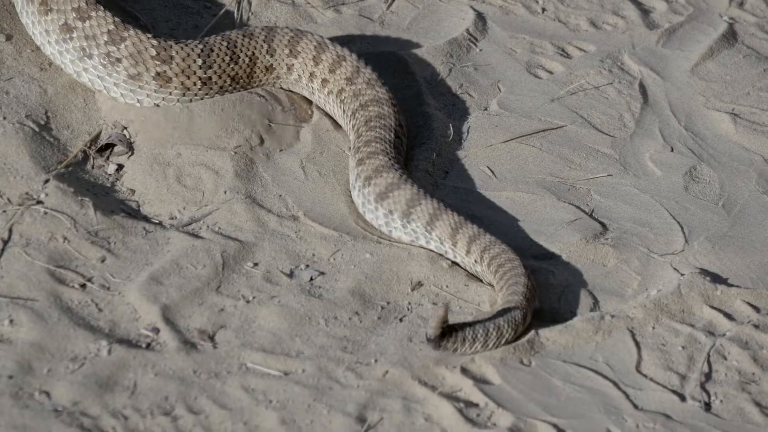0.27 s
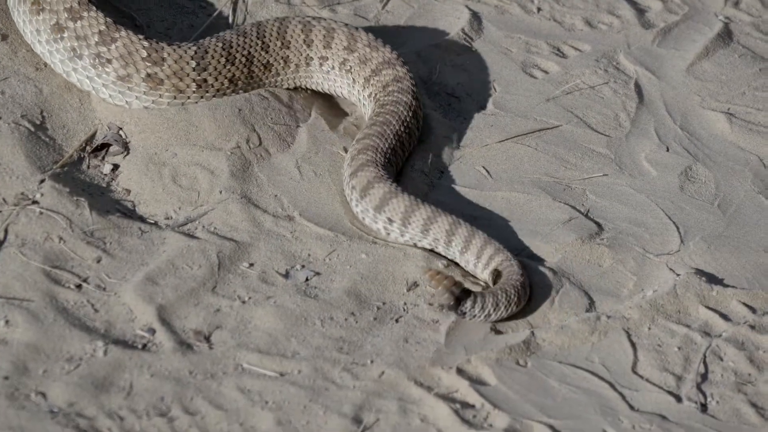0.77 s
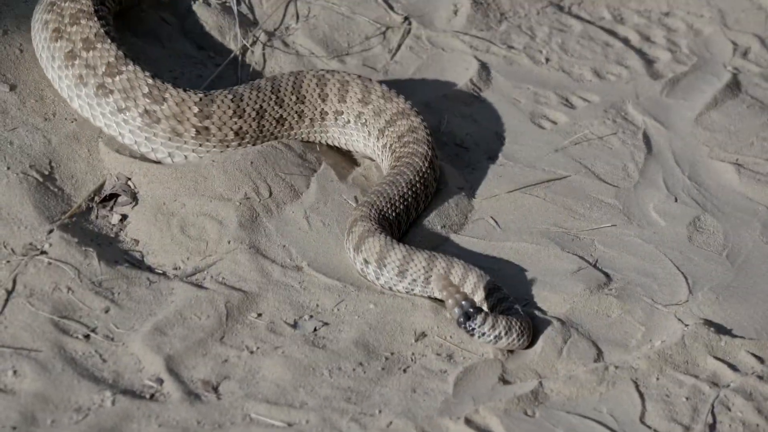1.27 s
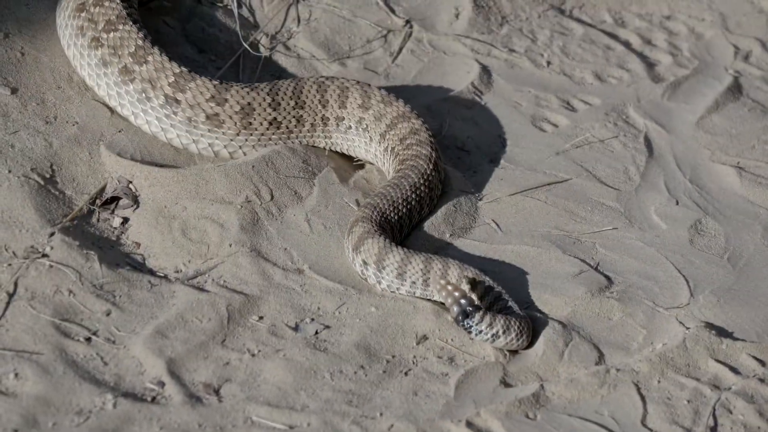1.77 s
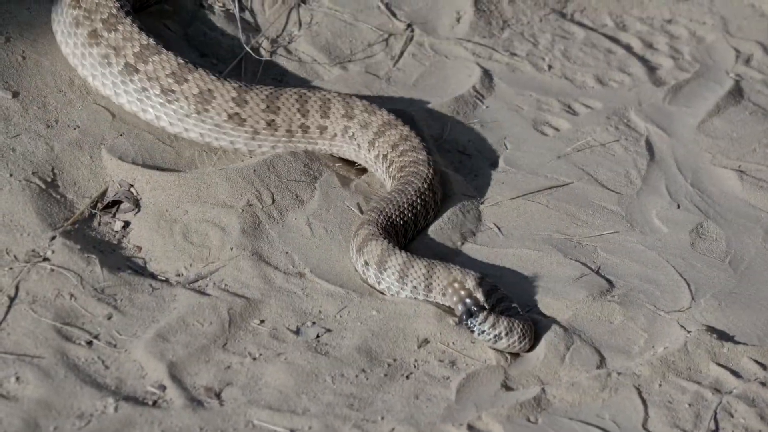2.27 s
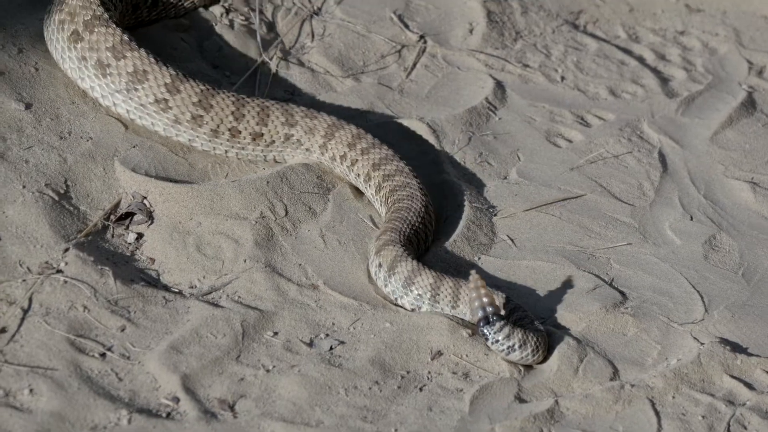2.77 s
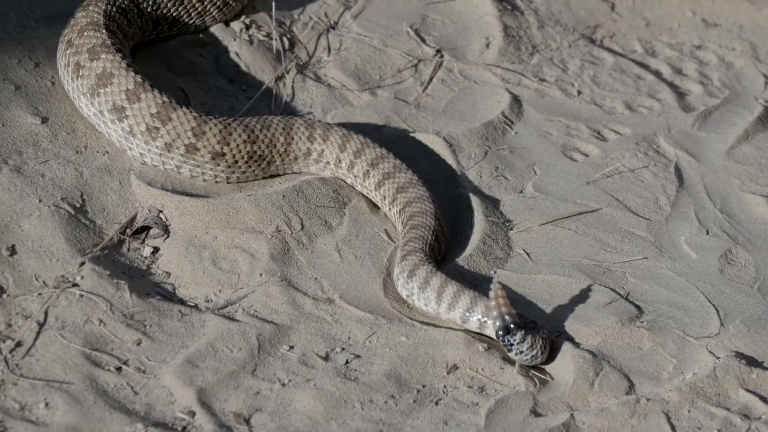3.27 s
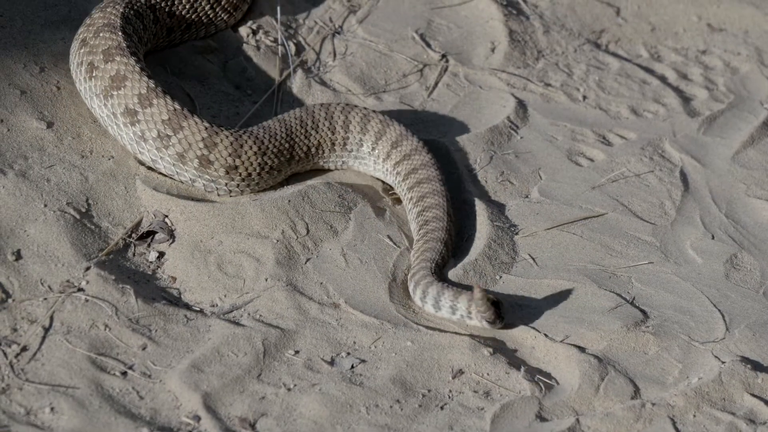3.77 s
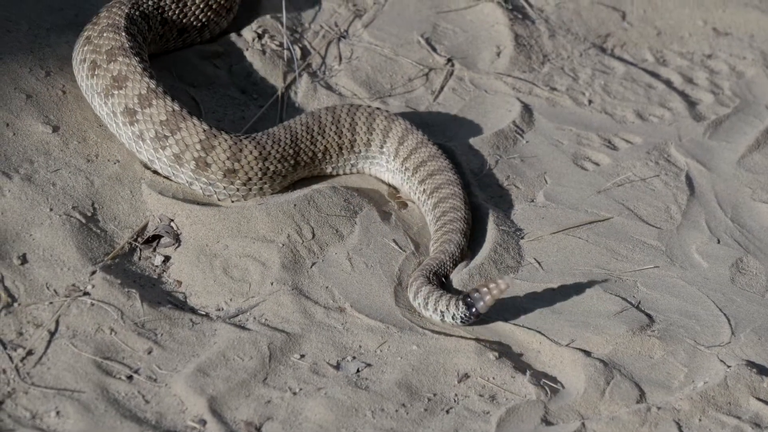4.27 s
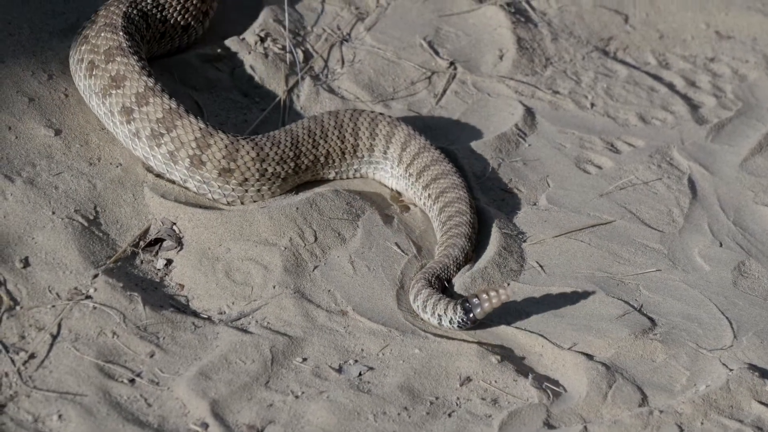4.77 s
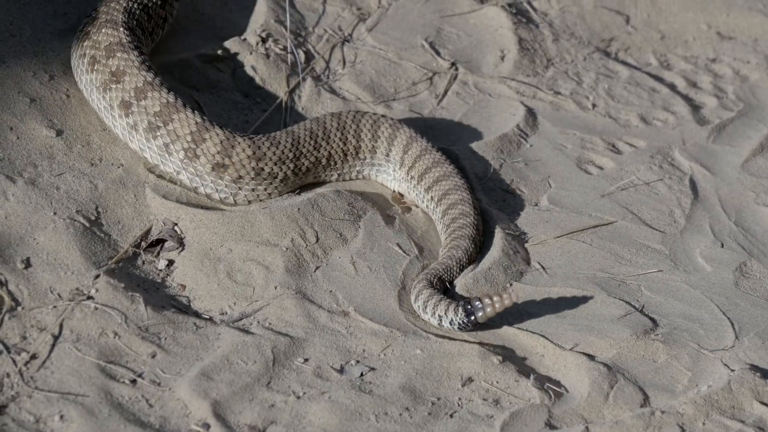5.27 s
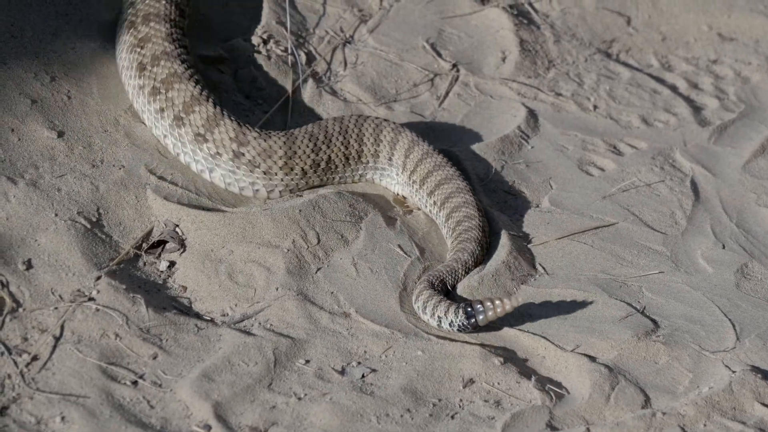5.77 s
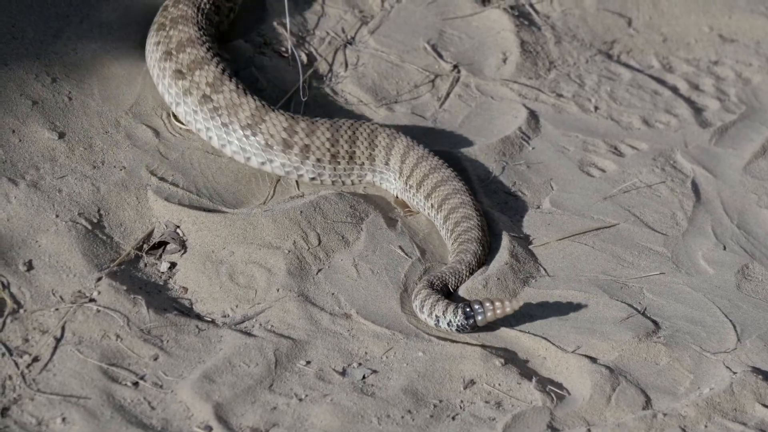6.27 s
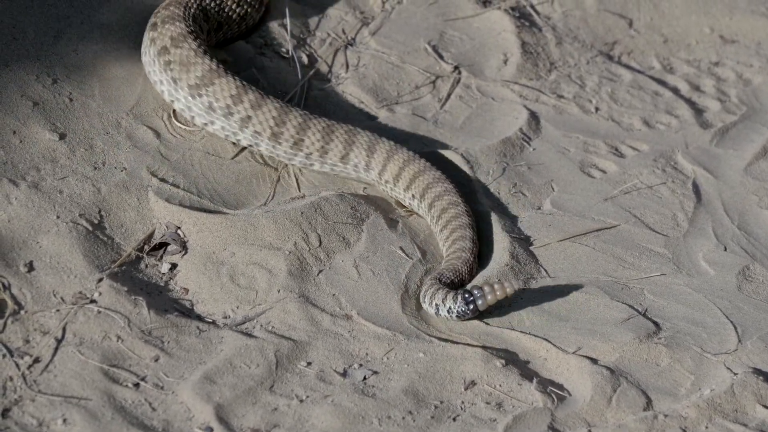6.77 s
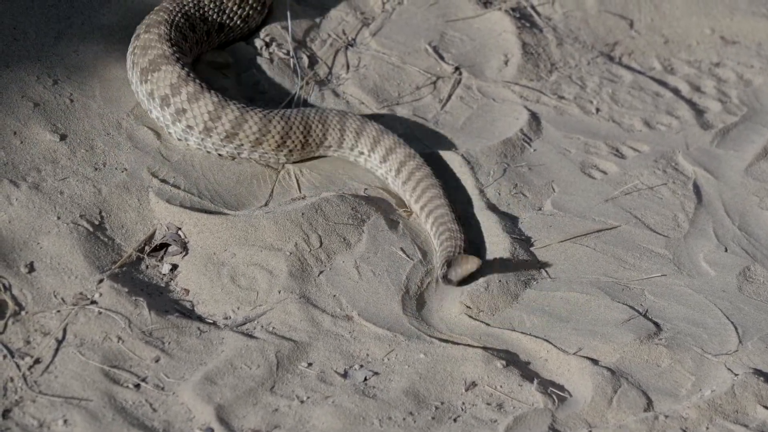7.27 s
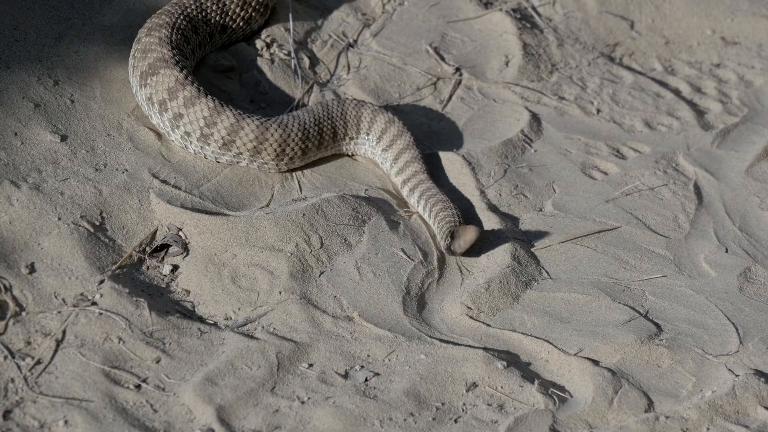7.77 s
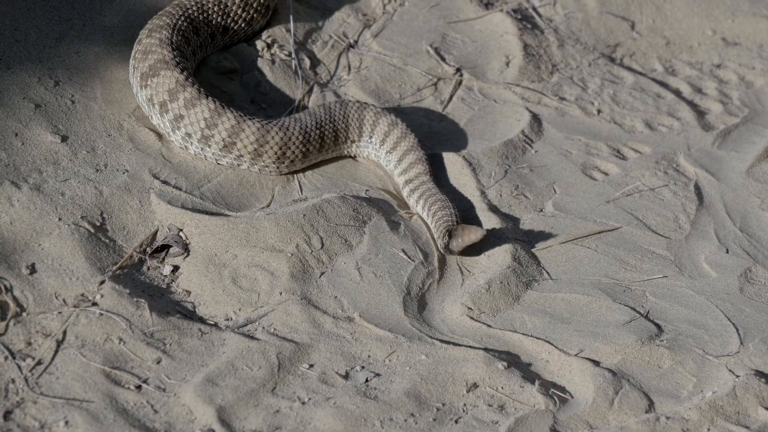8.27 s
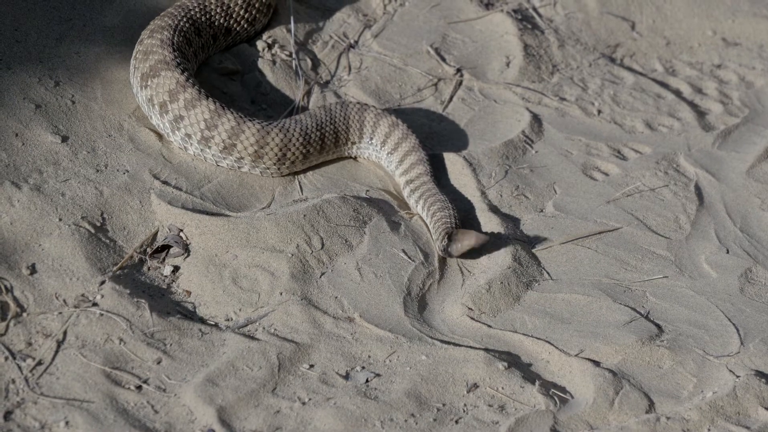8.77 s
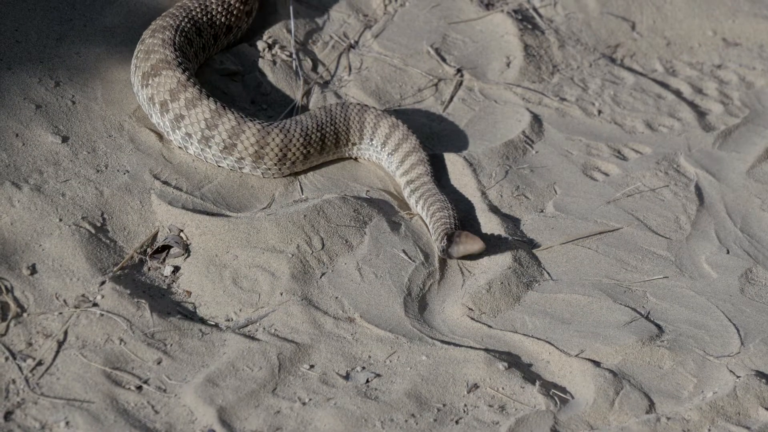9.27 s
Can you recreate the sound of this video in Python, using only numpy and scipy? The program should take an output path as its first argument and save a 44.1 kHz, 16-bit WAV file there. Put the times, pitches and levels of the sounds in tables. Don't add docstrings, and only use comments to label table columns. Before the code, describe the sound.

Close dry shell-like rattling at about twenty shakes a second swells and shifts in tone, while brief wind buffets thud and faint ticks come late.

```python
import sys
import numpy as np
from scipy import signal
from scipy.io import wavfile
from scipy.ndimage import uniform_filter1d

SR = 44100
rng = np.random.default_rng(int(sys.argv[2]) if len(sys.argv) > 2 else 0)


def voltage_ratio(level):
    return 10 ** (np.asarray(level, float) / 20)


def bounce(signal):
    frames = np.transpose(np.atleast_2d(signal))
    limited = np.clip(frames, -1, 1)
    pcm = np.round(limited * 32767).astype(np.int16)
    wavfile.write(sys.argv[1], SR, pcm)


N = 419391


def column(rows, k, t):
    rows = np.array(rows)
    return np.interp(t, rows[:, 0], rows[:, k])


def evened(x):
    return x / np.sqrt(np.mean(x ** 2) + 1e-20)


def noise(spectrum, same, patchy_db):
    log_hz = np.log(np.fft.rfftfreq(1024, 1 / SR) + 1)

    def on_log(rows):
        hz, value = np.transpose(rows)
        return np.interp(log_hz, np.log(hz + 1), value)[:, None]

    a, b, c, d, patches = rng.standard_normal((N // 256 + 5, 513, 5)).T
    patches = uniform_filter1d(patches, size=8, axis=0)
    patches = evened(uniform_filter1d(patches, size=14, axis=1))
    same = np.clip(on_log(same), 0, 1)
    left = a + 1j * b
    right = same * left + np.sqrt(1 - same ** 2) * (c + 1j * d)
    gain = voltage_ratio(on_log(spectrum) + patchy_db * patches)
    _, out = signal.istft(np.array([left, right]) * gain, nperseg=1024, noverlap=768)
    return evened(out[:, :N])


def add(mix, s, sound):
    start = round(s * SR) - len(sound) // 2
    mix[start:start + len(sound)] += sound


def wavelet(db, hz, ms, glide=0.193, crack=0.22):
    t = np.arange(-2 * ms, 2 * ms, 1000 / SR) / ms
    turns = np.cumsum(hz * (1 - np.tanh(glide * t))) / SR + rng.random()
    overtone = crack * np.exp(-11.5 * t ** 2) * np.cos(2 * np.pi * 1.9 * turns)
    bell = np.exp(-np.log(4) * t ** 2)
    return np.sqrt(2) * voltage_ratio(db) * bell * (np.cos(2 * np.pi * turns) + overtone)


# (time [s], swings made so far [count])
PACE = [(0.0, -0.35), (1.05, 21.03), (2.75, 57.24), (3.24, 66.37), (3.86, 76.94), (4.32, 84.16),
        (4.91, 92.31), (5.22, 96.19), (5.5, 99.02), (5.87, 102.58), (6.3, 109.84), (6.95, 122.39),
        (7.07, 125.25), (7.81, 140.01), (8.18, 145.86), (8.89, 159.58), (9.02, 162.7), (9.51, 172.29)]
# (time [s], peak level [dB], spread of click cluster [ms])
EFFORT = [(0.0, -44.5, 8.6), (1.33, -38.5, 14), (1.52, -33, 9.1), (2.47, -33.5, 19), (2.66, -30, 10.6),
          (3.42, -24.5, 11.5), (4.75, -35, 8.3), (5.13, -30, 9.3), (5.89, -34.5, 11), (6.08, -31, 9.5),
          (6.84, -27, 11.7), (7.03, -33, 14.3), (7.22, -31, 13.6), (7.6, -34, 18.6), (7.98, -29.5, 12.3),
          (8.74, -26.5, 9.8), (8.93, -31.5, 13.5), (9.5, -30, 13.8)]
# (time [s], extra level [dB], spread factor [ratio])
ODD_SWINGS = [(0.112, 5, 1), (0.27, 4.5, 0.63), (2.642, 5.5, 0.64), (2.845, 3, 0.96), (3.059, 1, 0.65),
              (3.168, -2.0, 1), (3.33, 0.8, 0.63), (3.39, 4, 0.82), (3.573, 1.9, 0.95), (3.683, -2.5, 0.82),
              (3.738, 0.5, 1.07), (4.056, 3.5, 1), (4.118, 3.5, 0.73), (4.174, 1.5, 0.64), (4.244, -6.5, 1),
              (5.046, 0.5, 1.3), (5.7, 4.5, 0.74), (5.938, -6.5, 1.4), (6.126, 3, 0.67), (6.719, 2, 1.2),
              (6.821, -3.5, 1.4), (7.15, 3.5, 0.79), (7.508, 5.5, 0.48), (7.693, -1, 0.75), (7.746, 0, 1.1),
              (8.061, 1.5, 0.95), (8.606, -4.5, 1.4), (8.648, 4.5, 0.76), (8.69, -2.5, 1.7),
              (8.808, 1, 1.06)]
UNEVEN_DB, UNEVEN_MS, LEAD_MS = .8, 1.1, 1.5
REBOUND_MS, REBOUND_DB, REBOUND_SPREAD_MS, REBOUND_CHANCE_DB = 22.2, -10, 3.2, 2.5
REBOUND_SLOW_DB, SLOWEST_GAP_S = 7, .085


def swings():
    when, made = np.transpose(PACE)
    count = int(made[-1]) + 1
    luck = rng.standard_normal((count, 5)).T
    s = np.interp(np.arange(count), made, when) + (UNEVEN_MS * luck[0] - LEAD_MS) / 1000
    extra_db, factor = UNEVEN_DB * luck[1], np.ones(count)
    for odd_s, odd_db, odd_factor in ODD_SWINGS:
        k = np.argmin(abs(s - odd_s))
        s[k], extra_db[k], factor[k] = odd_s, odd_db, odd_factor
    db = column(EFFORT, 1, s) + extra_db
    ms = column(EFFORT, 2, s) * factor
    back_s = s + REBOUND_MS / 1000 * np.exp(0.15 * luck[2])
    gap_s = np.gradient(s)
    slow = np.clip((gap_s - .05) / 0.014, 0, 1) * (gap_s < SLOWEST_GAP_S)
    back_db = db + REBOUND_DB + REBOUND_SLOW_DB * slow + REBOUND_CHANCE_DB * np.clip(luck[3], -2, 1)
    back_ms = REBOUND_SPREAD_MS * np.exp(.4 * luck[4])
    return np.r_[s, back_s], np.r_[db, back_db], np.r_[ms, back_ms]


def swing_power(at, rest_db=-56, steep=1.97):
    s, db, ms = np.array(swings(), np.float32)[:, :, None]
    t = np.arange(0, N / SR, 1 / 1000, np.float32)
    late = (t - s) * 1000 / ms + 0.1
    fall = np.where(late < 0, .5 * (steep * late) ** 2, abs(late) ** 1.3)
    return np.interp(at / SR, t, (voltage_ratio(2 * db) * np.exp(-fall)).sum(0)) + voltage_ratio(2 * rest_db)


def knock_sizes(power, size_db=5.5, clump_db=2.0):
    count = len(power)
    size = voltage_ratio(size_db * np.minimum(rng.exponential(1, count), 3.2))
    size *= voltage_ratio(clump_db * evened(uniform_filter1d(rng.standard_normal(count), size=6)))
    return size * np.sqrt(power / uniform_filter1d(size ** 2, size=20))


# (time [s], rolled over [-1 to 1], turned sideways [0-1], favoured pitch [Hz])
FACING = [(0, 0.00036, 0.2, 10000), (2.3, 0.23, 0.01, 6000), (2.7, 0.42, 0.31, 10000),
          (3.12, 0.74, 0.41, 9800), (3.2, 0.46, .9, 4900), (3.62, 0.05, 1, 5460), (3.85, -0.068, 0.8, 6950),
          (4.1, 0.16, 0.62, 7400), (4.3, -0.16, 0.26, 5640), (4.75, -0.74, 0.35, 5460),
          (5.1, 0.35, .8, 4950), (5.6, -0.21, 0.9, 7140), (5.9, -0.53, 0.7, 6660), (6.2, 0.31, 0.47, 9900),
          (6.6, 0.12, 0.14, 6100), (7.8, 0.2, 0.17, 9800), (8.2, 0.18, 0.31, 10100),
          (9.5, 0.13, 0.04, 6000)]
# (pitch [Hz], width [Hz], level [dB], change when sideways [dB])
SHELLS = [
    [(3494, 150, -12.5, -4), (3710, 57, -2.5, -10), (3944, 116, -10, -3.5)],
    [(4500, 61, -9.5, 9), (5137, 650, -6.5, 4.5), (5506, 200, 0.5, -4.5), (5970, 122, 2, -7)],
    [(6456, 85, -1.5, 3), (6840, 190, -4, 7), (7390, 190, 3.5, -1.5), (7880, 73, -0.5, 6.5),
     (8395, 95, 2, -5.5)],
    [(9060, 1000, -5, 10), (9670, 200, -6.5, 19.5), (9900, 77, 2.5, 6), (10286, 240, 3, 5.5),
     (10730, 170, 2, 1.5), (11480, 69, -1.5, 2), (12250, 990, -9, 13.5), (12850, 410, -7, 4),
     (13700, 640, -26, -2), (14900, 910, -20, 5)],
]
GROUP_DB, ROLL_DB = [2, 1.5, -2, -2.5], [11, -2, 3.5, 6.5]
FAVOUR_DB, FAVOUR_OCTAVES = 5.5, 0.15


def facing_level_db(at):
    hz, _, _, side_db = np.concatenate(SHELLS).T
    group = np.repeat(np.arange(4), [len(g) for g in SHELLS])
    roll, sideways, favoured_hz = [column(FACING, k, at / SR)[:, None] for k in (1, 2, 3)]
    off_pitch = np.log2(hz / favoured_hz) / FAVOUR_OCTAVES
    turned_db = np.array(GROUP_DB)[group] + roll * np.array(ROLL_DB)[group] + sideways * side_db
    return turned_db + FAVOUR_DB * sideways * np.exp(-.5 * off_pitch ** 2)


def rattle(choosy_db=4.0, loose=0.17, twist=0.64, wobble=0.23, swing_db=2.5):
    at = np.cumsum(rng.exponential(SR / 2100, 24000))
    at = at[at < N].astype(int)
    power = swing_power(at)
    size = knock_sizes(power)
    hz, width_hz, mode_db, _ = np.concatenate(SHELLS).T
    colour = width_hz * voltage_ratio(mode_db + facing_level_db(at))
    draws = rng.standard_normal((len(at), len(hz), 4), np.float32)
    luck, turn, apart, lean = draws.transpose(2, 0, 1)
    lead = uniform_filter1d(lean, size=50, axis=0)
    lead = evened(uniform_filter1d(lead, size=3, axis=1))
    sideways = column(FACING, 2, at / SR)[:, None]
    colour *= voltage_ratio(swing_db * (.5 + sideways) * lead)
    colour *= voltage_ratio(choosy_db * luck)
    colour /= np.sqrt((colour ** 2 / width_hz).sum(1, keepdims=True))
    share = size[:, None] * colour * np.exp(2j * np.pi * loose * turn) * np.sign(turn[:, :1])
    u = np.arange(256) / SR
    onset = (1 - np.exp(-u / 0.00014)) ** 2
    rings = -1j * np.exp((2j * np.pi * hz - np.pi * width_hz)[:, None] * u) * onset
    places = (at[:, None] + np.arange(256)).ravel()
    out = np.zeros((2, N + 256))
    for k, sign in enumerate((1, -1)):
        phase = twist * (-1) ** np.arange(len(hz)) + wobble * apart
        seen = share * np.exp(sign * (.5j * phase + 0.17 * lean))
        knocks = (seen.astype(np.complex64) @ rings.astype(np.complex64)).real
        out[k] = np.bincount(places, knocks.ravel(), N + 256)
    return out[:, :N] * np.sqrt(power.mean() / np.mean(out.mean(0) ** 2))


def sand(x, wet_db=-16, t60_s=0.0044):
    t = np.arange(2200) / SR
    taps = rng.standard_normal((2, 2200)) * (rng.random((2, 2200)) < .05) * voltage_ratio(-60 * t / t60_s)
    taps /= np.linalg.norm(taps, axis=1, keepdims=True)
    return x + voltage_ratio(wet_db) * signal.oaconvolve(x, taps, axes=1)[:, :N]


# (frequency [Hz], density [dB per Hz])
HISS = [(18, -50), (40, -25), (90, -13), (220, -8), (390, -1), (600, -7), (800, -5), (1050, -8), (1500, -8),
        (2100, -12), (3000, -15), (6000, -21), (10000, -23), (16000, -26)]
# (frequency [Hz], likeness [0-1])
SAME = [(200, 0.38), (390, 0.32), (700, 0.44), (1300, 0.24), (2400, 0.028), (8000, 0.41)]
# (time [s], level [dB])
SWELL = [(0, -3.5), (1.2, -1.5), (3.3, 2.5), (5.6, -0.4), (6.7, -0.3), (7.7, 0.3), (9.5, 0.9)]
# (time [s], level [dB], pitch [Hz], length [ms])
CHIRP = [
    (0.487, -51, 1554, 32),
    (7.25, -43.5, 798, 11),
]
PART_DB, PART_SHARE = [-45.5, -45, -40], [0.9, 0.054, 1]


def background():
    hiss = noise(HISS, SAME, patchy_db=1.0)
    hum = signal.sosfiltfilt(signal.butter(2, 650, "low", fs=SR, output="sos"), hiss)
    fizz = signal.sosfiltfilt(signal.butter(2, 3000, "high", fs=SR, output="sos"), hiss)
    swell_db = column(SWELL, 1, np.arange(N) / SR)
    out = np.zeros((2, N))
    for part, db, share in zip((hum, hiss - hum - fizz, fizz), PART_DB, PART_SHARE):
        out += part * voltage_ratio(db + share * swell_db)
    notes = np.zeros(N)
    for s, db, hz, ms in CHIRP:
        add(notes, s, wavelet(db, hz, ms, glide=0, crack=0))
    return out + notes


# (time [s], hold [s], left level [dB], right level [dB])
GUSTS = [(4.037, .08, -35.5, -39), (4.355, .03, -39, -52), (4.498, 0.053, -31, -52),
         (4.79, 0.069, -38, -55), (4.915, .06, -44, -60), (5.042, 0.077, -31.5, -38),
         (5.2, 0.026, -46, -43), (5.325, 0.093, -40, -29.5), (5.46, .07, -43, -42)]
GUST_RISE_DB_PER_S, GUST_FALL_DB_PER_S = 280, 188


def gusts(t):
    power = np.zeros((2, len(t)))
    for s, hold_s, left_db, right_db in GUSTS:
        rise_db = np.maximum(GUST_RISE_DB_PER_S * (s - t), 0)
        fall_db = np.maximum(GUST_FALL_DB_PER_S * (t - s - hold_s), 0)
        power += voltage_ratio(2 * (np.array([[left_db], [right_db]]) - (rise_db + fall_db)))
    return np.sqrt(power)


# (frequency [Hz], density [dB per Hz])
RUMBLE = [(30, -33), (70, -24), (130, 6), (220, -7), (330, -10.5), (500, -18.5), (900, -45)]
# (time [s], level [dB], pitch [Hz], length [ms])
PUFFS = [
    (1.032, -53, 89, 20),
    (2.971, -47, 109, 23),
    (7.85, -50, 121, 25),
]
EDDIES_LEFT = [(4.07, -27, 282, 8.3), (4.121, -28, 209, 6.6), (4.356, -28.5, 261, 8.9),
               (4.39, -22.5, 268, 5.4), (4.432, -29, 243, 3.8), (4.472, -34, 222, 13),
               (4.496, -14, 228, 2.4), (4.537, -26, 313.5, 22), (4.567, -32, 244, 6.1),
               (4.613, -35, 244, 6.2), (4.821, -18, 310, 2.03), (4.895, -38, 210, 8.5),
               (4.981, -32, 227, 6.4), (5.008, -39, 194, 6.6), (5.058, -14, 200, 4.36),
               (5.096, -45, 260, 9.1), (5.119, -38, 280, 3.1), (5.141, -33, 206, 7.0),
               (5.311, -9.5, 211, 3.4), (5.376, -35, 222, 16), (5.459, -30, 169, 5), (5.513, -30, 165, 7.2)]
# (time [s], level [dB], pitch [Hz], length [ms])
EDDIES_RIGHT = [(4.061, -33, 266, 6.9), (4.108, -40, 150, 7.8), (4.498, -48, 197, 8.3),
                (5.045, -34, 173, 5.6), (5.058, -27, 182, 9.4), (5.145, -36, 175, 8.8),
                (5.221, -28, 199, 7.4), (5.327, -25, 193, 5.5), (5.349, -21, 162, 8),
                (5.369, -17, 233, 8.8), (5.435, -26.5, 354, 5), (5.467, -27, 237, 4.3),
                (5.489, -21.5, 219, 3.6), (5.525, -28.5, 180, 4.2),
                (5.377, -20.5, 340, 2.7),
]


def wind(leak_db=-17):
    t = np.arange(N) / SR
    strength = np.array([np.interp(t, t[::100], port) for port in gusts(t[::100])])
    out = noise(RUMBLE, [(30, 0.5), (900, 0.1)], patchy_db=4.0) * strength
    for port, rows in enumerate(([*EDDIES_LEFT, *PUFFS], EDDIES_RIGHT)):
        for s, db, hz, ms in rows:
            add(out[port], s, wavelet(db, hz, ms))
    low_cut = signal.butter(2, 65, "high", fs=SR, output="sos")
    return signal.sosfilt(low_cut, out + voltage_ratio(leak_db) * out[::-1])


# (time [s], peak level [dB])
TICKS = [(8.3788, -31), (8.4155, -32), (8.4535, -29), (8.4928, -28), (8.5302, -26), (8.5675, -29),
         (8.6058, -31)]


def ticks(hz=4300, pan_db=3, lift_db=2.5):
    out, t = np.zeros(N), np.arange(-40, 40) / SR
    snap = -np.gradient(np.exp(-(np.pi * hz * t) ** 2))
    for s, db in TICKS:
        add(out, s, voltage_ratio(db + lift_db) * snap / snap.max())
    return out * voltage_ratio([[pan_db], [-pan_db]])


def scene():
    near = rattle() * voltage_ratio([[-.3], [.3]]) + ticks()
    return sand(near) + background() + wind()


def roll_off(x):
    return signal.sosfilt(signal.butter(12, 16150, fs=SR, output="sos"), x)


def record(dry):
    edge = signal.firwin(1001, 15690, window=("kaiser", 9), fs=SR)
    mix = signal.oaconvolve(dry, edge[None], "same", axes=1)
    return roll_off(mix)


dry = scene()
out = record(dry)
bounce(out)
```